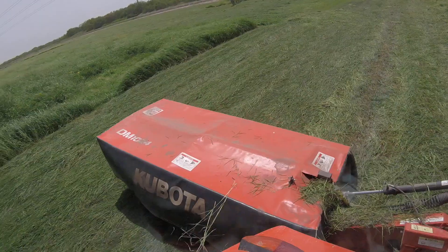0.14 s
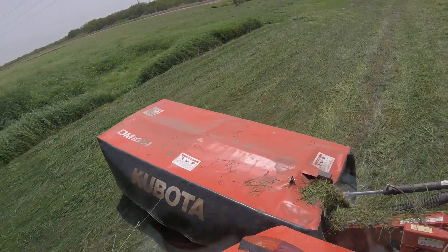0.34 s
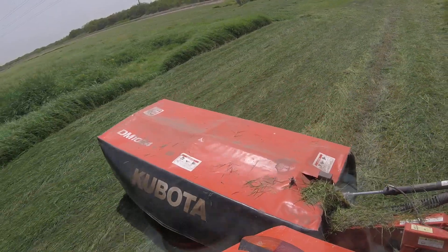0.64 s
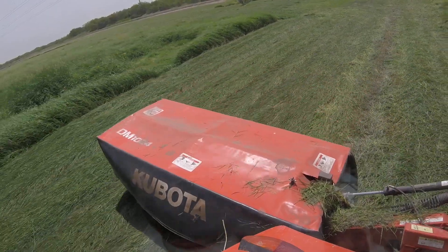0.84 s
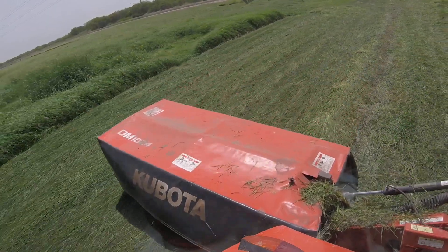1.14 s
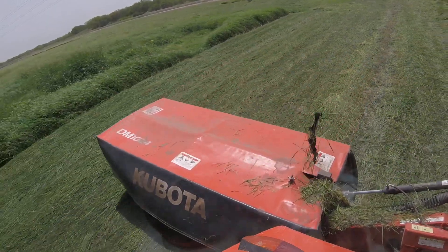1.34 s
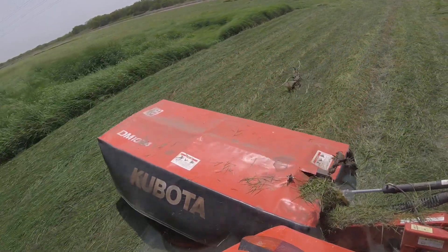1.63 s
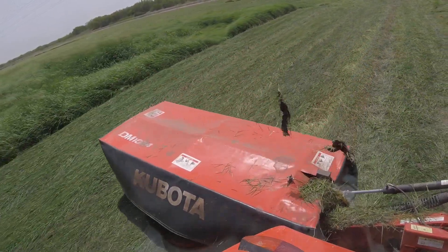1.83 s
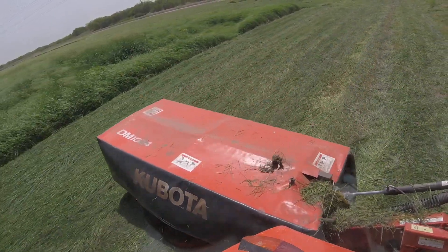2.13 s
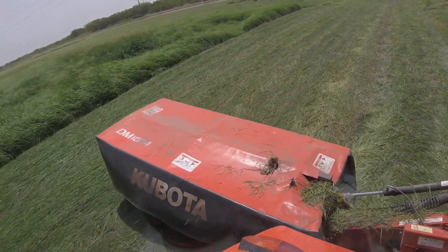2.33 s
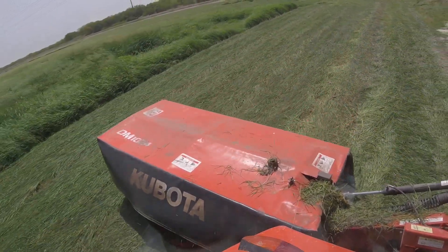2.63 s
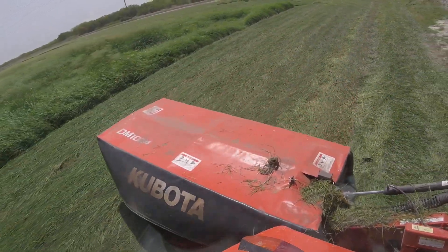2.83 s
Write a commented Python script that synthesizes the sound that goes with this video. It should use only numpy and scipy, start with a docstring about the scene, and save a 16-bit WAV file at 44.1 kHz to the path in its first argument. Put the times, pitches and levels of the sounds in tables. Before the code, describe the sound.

Loud constant roar of a tractor and disc mower cutting grass, growing slightly heavier halfway through

```python
"""On board a four-cylinder diesel tractor mowing grass at working speed, the microphone beside a disc mower.
From the start the engine throbs and clatters, the discs hum and tear grass under their hood, gears whine
and the frame shakes in swells: summed tones and coloured noise on one drive line.
Near 0.7 s stalks click and rustle on the housing. Halfway through the crop gets heavier: the speed sags
a little, the hum shifts and the cutting grows louder; near 2.3 and 2.5 s stalks click again."""
import sys
import numpy as np
from scipy import signal
from scipy.fft import rfft, irfft
from scipy.io import wavfile

SR = 44100
rng = np.random.default_rng(int(sys.argv[2]) if len(sys.argv) > 2 else 0)


def unload_wav(signal):
    """Save mono or channel-first audio to the path in sys.argv[1] as 16-bit WAV at rate SR, clipped to [-1, 1]."""
    wavfile.write(
        sys.argv[1],
        SR,
        np.round(np.clip(np.atleast_2d(signal).T, -1, 1) * 32767).astype(np.int16),
    )


N = 130977
T = np.arange(N) / SR  # time of every sample [s]

DISC_HZ, CYCLE_HZ = 57.0, 13.512  # disc turns and four-stroke engine cycles per second at working speed
# strength of the cutting noise and engine clatter: (time [s], middle [relative dB], treble [relative dB])
CUT_LEVEL = [(0.0, -38.5, -45.5), (0.09, -39, -44.5), (0.29, -38, -46), (0.67, -38, -45),
             (0.74, -43, -46.5), (0.77, -41.5, -48.5), (1.43, -39.5, -45.5), (1.62, -38, -47),
             (1.89, -38, -46), (2.36, -37, -43.5), (2.39, -38, -43.5), (2.46, -36, -43),
             (2.66, -36.5, -44.5), (2.97, -36.5, -43.5)]


def amp(db):
    """Decibels to gain."""
    return 10 ** (np.asarray(db) / 20)


def unit(x):
    """Scales to rms 1."""
    return x / np.sqrt(np.mean(x ** 2) + 1e-20)


def curve(rows, axis=1):
    """One column of a time table, at every sample."""
    rows = np.array(rows)
    return np.interp(T, rows[:, 0], rows[:, axis])


def drift(rate_hz):
    """Slow chance of rms 1: noise that fades out above the given rate."""
    f = np.fft.rfftfreq(N, 1 / SR)
    lowpass = (f > 0) / (1 + (f / rate_hz) ** 4)
    return unit(irfft(rfft(rng.standard_normal(N)) * lowpass, N))


def colour(x, points):
    """Gives a sound a spectrum, at rms 1."""
    hz, db = np.transpose(points)
    f = np.fft.rfftfreq(N, 1 / SR)
    gain = amp(np.interp(np.log(f + 1), np.log(hz), db))
    return unit(irfft(rfft(x) * gain, N))


def tone(turns, waver, rate_hz):
    """A rotating part's tone of about rms 1, wavering in strength and phase."""
    angle = 2 * np.pi * (turns + rng.random())
    in_phase = (1 + waver * drift(rate_hz)) * np.cos(angle)
    quadrature = waver * drift(rate_hz) * np.sin(angle)
    return np.sqrt(2 / (1 + 2 * waver ** 2)) * (in_phase + quadrature)


def pulsed(turns, depth, decay):
    """Noise that jumps up once a turn and dies away; decay is a share of the turn."""
    return (1 + depth * np.exp(-(turns % 1) / decay)) * rng.standard_normal(N)


def rumble(clock):
    """The frame wobbles in swells as it rides over the field, over a steady low rumble of frame and air."""
    # swells of the wobble: (time [s], level [relative dB])
    shake_level = [(0, -31.5), (.18, -22), (.37, -17.5), (.62, -29.5), (.79, -18), (1.0, -30.5), (1.3, -31),
                   (1.48, -22.5), (1.72, -16.5), (1.9, -29), (2.0, -22), (2.4, -21.5), (2.6, -15),
                   (2.8, -24), (2.97, -16.5)]
    # frame shake and air at the microphone: (frequency [Hz], density [relative dB per Hz])
    rumble_spectrum = [(5, -38), (14, -18), (19, 3), (28, -14.5), (40, -7.5), (70, -18), (110, -38),
                       (250, -59), (800, -94)]
    shake_hz, shake_db, rumble_db = 23.4, -0.5, -28
    wobble = amp(shake_db + curve(shake_level)) * tone(shake_hz * clock, waver=0.074, rate_hz=2.7)
    return wobble + amp(rumble_db) * colour(rng.standard_normal(N), rumble_spectrum)


def ticks():
    """Tiny dry clicks of flung stalks and grit, and a brief grainy rustle of stalks brushing the housing."""
    # clicks on the housing: (time [s], level before the band filter [dB])
    clicks = [(.696, -46), (.729, -43), (.738, -45), (2.277, -51), (2.46, -50)]
    tick_s, tick_hz, tick_width_hz = 0.00026, 7400, 3500  # decay time, middle and width of the band
    rustle_s, rustle_length_s, rustle_db = 0.74, 0.038, -69  # middle, half length, level before the filter
    bursts = sum(amp(db) * (T >= s) * np.exp(-abs(T - s) / tick_s) for s, db in clicks)
    grain = amp(rustle_db + 3.6 * drift(rate_hz=400))
    rustle = grain * np.exp(-((T - rustle_s) / rustle_length_s) ** 2)
    band = [tick_hz - tick_width_hz / 2, tick_hz + tick_width_hz / 2]
    housing = signal.butter(2, band, "band", fs=SR, output="sos")
    return signal.sosfilt(housing, (bursts + rustle) * rng.standard_normal(N))


def gears(clock, load):
    """Rough shaft and gear tones shift with load; a fine transmission whine throbs gently."""
    # gear and shaft tones: (frequency at working speed [Hz], light grass [dB], heavy grass [dB])
    gear_tones = [(154.1, -38.5, -38), (207.6, -45.5, -46), (308.2, -50, -47), (513.6, -43.5, -48),
                  (862, -57, -54.5), (920, -57, -57), (1027, -50, -49), (1066, -56, -53.5),
                  (1251, -60, -54), (1334, -50.5, -47.5), (1540, -55.5, -55), (1568, -62, -56),
                  (1592, -55.5, -55)]
    # transmission whine: (frequency at working speed [Hz], level [relative dB], depth of throb [0-1])
    whine_tones = [(3088, -5, .1), (3184, -.5, .1), (3388, -.5, .3)]
    # course of the whine: (time [s], two lower tones [relative dB], top tone [relative dB])
    whine_level = [(0, -62, -49), (.22, -63, -57), (.4, -54.5, -52), (.68, -47, -53), (.8, -59, -60),
                   (1.05, -62, -55), (1.35, -52, -54), (1.62, -66, -56), (1.8, -59, -46.5),
                   (2.0, -50, -50.5), (2.22, -54, -55), (2.44, -55, -47), (2.68, -48, -54),
                   (2.97, -66, -44.5)]
    whine_beat_hz = 6.4  # at working speed
    low = np.zeros(N)
    for hz, light, heavy in gear_tones:
        low += amp(light + (heavy - light) * load) * tone(hz * clock, waver=0.29, rate_hz=13)

    beat = np.cos(2 * np.pi * whine_beat_hz * clock)
    lower, top = curve(whine_level), curve(whine_level, axis=2)
    high = np.zeros(N)
    for (hz, db, depth), level in zip(whine_tones, [lower, lower, top]):
        high += amp(db + level) * (1 + depth * beat) * tone(hz * clock, waver=0.2, rate_hz=47)
    return low + high


def clatter(clock):
    """Injectors and valves repeat a fine rattle every engine cycle; its pattern shifts slowly at even strength."""
    # rattle of injectors and valves: (frequency [Hz], density [relative dB per Hz])
    clatter_spectrum = [(200, -28), (500, 5), (900, 2), (1300, -6), (2000, -2.5), (2400, -12), (3100, -6),
                        (3900, -12.5), (4600, -30), (7000, -63.5)]
    clatter_db = -0.84
    size = round(SR / CYCLE_HZ)  # samples in one cycle
    place = (CYCLE_HZ * clock % 1) * size
    shares = np.array([drift(rate_hz=0.89) for _ in range(4)])
    shares = shares / np.linalg.norm(shares, axis=0)
    # four fixed noise patterns, blended in slowly changing shares
    rattle = sum(share * np.interp(place, np.arange(size), rng.standard_normal(size)) for share in shares)
    return amp(clatter_db + curve(CUT_LEVEL)) * colour(rattle, clatter_spectrum)


def engine(clock, load):
    """Four cylinders fire in turn: tonal orders and exhaust puffs booming around the hood follow the effort."""
    # orders of the four-stroke cycle: (multiple, light grass [relative dB], heavy grass [relative dB])
    engine_orders = [(2, -45, -33), (3, -56, -47.5), (4, -48, -38.5), (7, -46.5, -50), (8, -32, -32.5),
                     (9, -37.5, -43), (10, -46.5, -48), (11, -42.5, -43.5), (12, -31, -36),
                     (13, -49, -44.5), (14, -40.5, -38), (16, -43, -42), (17, -45.5, -46), (20, -46.5, -45),
                     (24, -51.5, -49), (27, -61, -56), (28, -57, -56), (31, -59.5, -51.5), (32, -57.5, -49),
                     (34, -53, -47.5), (35, -45.5, -45.5), (45, -52.5, -46.5), (48, -56.5, -55)]
    # boom of the hood and exhaust: (frequency [Hz], density [relative dB per Hz])
    boom_spectrum = [(30, -10.5), (55, -6.5), (80, -6.5), (115, 1), (138, -4.5), (165, 0.5), (220, -2),
                     (260, -7.5), (330, -7), (400, -14.5), (700, -47), (2000, -83.5)]
    # the engine's effort: (time [s], level [relative dB])
    boom_level = [(0.0, -24), (0.52, -27.5), (0.56, -23), (0.63, -28), (0.85, -28), (0.88, -35.5),
                  (0.93, -28.5), (1.34, -26), (1.36, -29.5), (1.72, -25.5), (1.87, -26.5), (1.89, -25),
                  (1.94, -32), (2.04, -24), (2.48, -28), (2.84, -21.5), (2.89, -25.5), (2.97, -26)]
    cylinders, boom_db = 4, -3.5
    effort = curve(boom_level)
    orders = np.zeros(N)
    for k, light, heavy in engine_orders:
        orders += amp(light + (heavy - light) * load) * tone(k * CYCLE_HZ * clock, waver=0.19, rate_hz=3.3)
    puffs = colour(pulsed(cylinders * CYCLE_HZ * clock, depth=1.0, decay=0.11), boom_spectrum)
    return orders * amp(effort - effort.mean()) + amp(boom_db + effort) * puffs


def discs(clock, load):
    """The discs' hum changes as they fill; near the hood panel's pitch it beats with drive shaft and engine."""
    # hum of the cutter discs: (multiple of the turning rate, light grass [dB], heavy grass [dB])
    disc_tones = [(2, -49.5, -50), (3, -45, -44), (4, -47, -46), (6, -55.5, -36), (11, -43.5, -45),
                  (12, -52, -39.5), (15, -56, -50.5)]
    shaft_per_cycle = 2 / 3  # turns of the mower's drive shaft in one engine cycle
    flutter_hz, flutter_width_hz = 627, 28  # hood panel that the shaft and engine rock
    flutter_shaft, flutter_engine = 0.42, 0.65  # depth of the beats at the panel's pitch
    cycle = 2 * np.pi * CYCLE_HZ * clock
    beats = flutter_shaft * np.cos(shaft_per_cycle * cycle) + flutter_engine * np.cos(cycle)
    hum = np.zeros(N)
    for k, light, heavy in disc_tones:
        hz = k * DISC_HZ
        flutter = 1 + beats * np.exp(-((hz - flutter_hz) / flutter_width_hz) ** 2)
        hum += amp(light + (heavy - light) * load) * flutter * tone(hz * clock, waver=0.31, rate_hz=15.0)
    return hum


def cutting(clock):
    """Blade passes tear bursts of noise from the grass under the hood; flung clippings hiss more evenly."""
    # blades tearing grass: (frequency [Hz], density [relative dB per Hz])
    cut_spectrum = [(100, -11), (400, 2.5), (650, 1), (760, -2), (900, -1.5), (1250, 2), (1430, -2.5),
                    (1600, -1), (1900, -6.5), (2250, -12.5), (2700, -12), (3500, -35), (5000, -71.5)]
    # flung clippings: (frequency [Hz], density [relative dB per Hz])
    hiss_spectrum = [(1000, -40), (2200, -13), (2700, -12), (3100, -9.5), (3400, -11.5), (3600, -14),
                     (3950, -13), (4350, -22), (4800, -27), (5700, -30), (6150, -27), (6500, -23.5),
                     (6950, -35), (8300, -41), (10000, -51), (12000, -58.5)]
    cut_db, hiss_db = -0.37, -1
    passes = pulsed(2 * DISC_HZ * clock, depth=0.21, decay=0.52)  # two blade passes a turn
    tear = colour(passes * amp(0.48 * drift(rate_hz=23)), cut_spectrum)
    hiss = colour(rng.standard_normal(N), hiss_spectrum)
    return amp(cut_db + curve(CUT_LEVEL)) * tear + amp(hiss_db + curve(CUT_LEVEL, axis=2)) * hiss


def scene():
    """One drive line turns everything; its clock counts seconds of turning at working speed."""
    # speed of the whole drive line: (time [s], cutter disc turns per second [Hz])
    speed = [(0, 57.08), (.25, 57.11), (.42, 56.98), (.75, 57.07), (1.2, 57.14), (1.52, 57.12),
             (1.75, 56.96), (2.0, 56.82), (2.2, 56.8), (2.5, 56.94), (2.97, 56.95)]
    # how full of grass the mower is: (time [s], share [0-1])
    grass_load = [(0, 0), (1.5, 0.16), (1.8, 0.53), (1.92, 0.63), (2.35, 1), (2.65, 0.92), (2.97, 0.73)]
    clock = np.cumsum(curve(speed) / DISC_HZ) / SR
    load = curve(grass_load)
    tractor = rumble(clock) + gears(clock, load) + clatter(clock) + engine(clock, load)
    mower = ticks() + discs(clock, load) + cutting(clock)
    return (tractor + mower)[None]


def record(dry):
    """The recorder's band limit: a steep linear-phase filter takes away the top treble."""
    edge_hz = 11760
    lowpass = signal.firwin(511, edge_hz, window=("kaiser", 9), fs=SR)
    return signal.oaconvolve(dry, lowpass[None], "same")


dry = scene()
out = record(dry)
unload_wav(out)
```